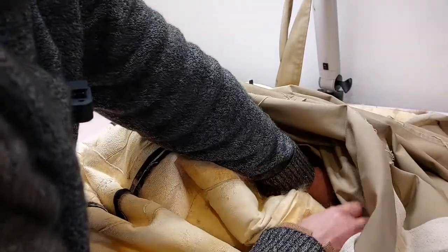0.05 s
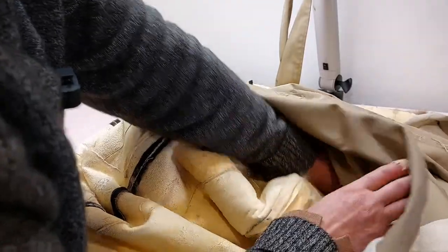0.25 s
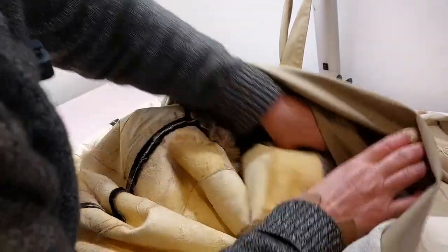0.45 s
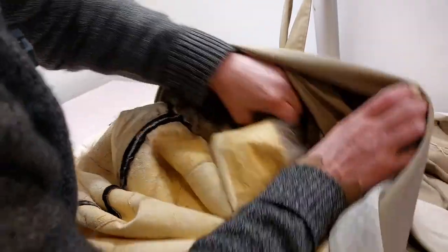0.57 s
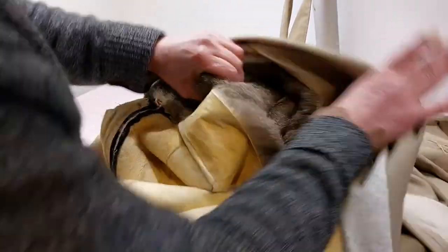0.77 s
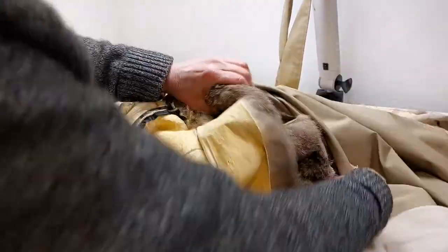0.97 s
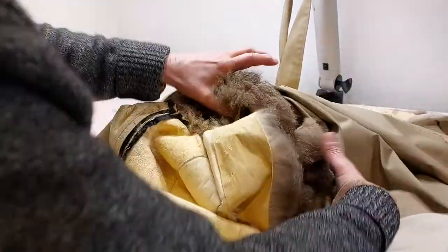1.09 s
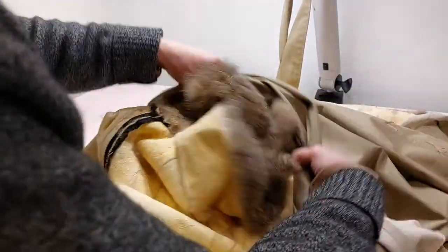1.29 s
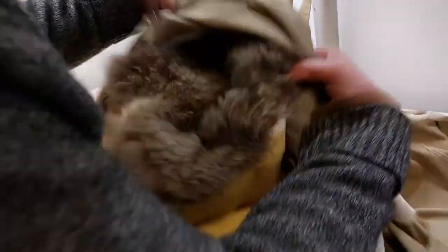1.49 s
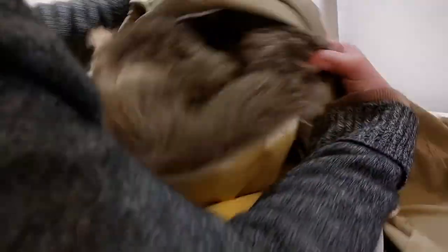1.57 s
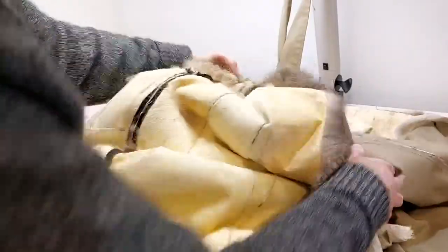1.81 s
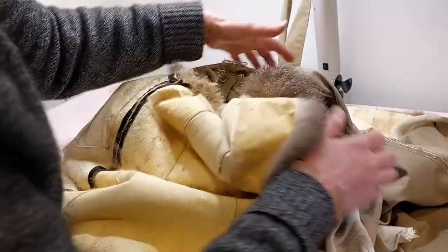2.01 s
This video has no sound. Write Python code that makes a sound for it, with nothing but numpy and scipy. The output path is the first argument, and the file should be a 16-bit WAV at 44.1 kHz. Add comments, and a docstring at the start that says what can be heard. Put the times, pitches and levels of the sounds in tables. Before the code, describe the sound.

Close rustling of a thick coat being folded by hand, with dull pops and soft thumps.

```python
"""A heavy fur-lined coat, folded and turned by hand on a table, close to a stereo pair in a small room.
Cloth slides on cloth with a grainy swish, the thick hide crumples, and single folds buckle with dull pops.
The coat's weight thumps down softly a few times; seams tick, a button knocks, a sleeve zips over the weave.
Behind it are a short tail from the walls and a low, steady room tone."""
import sys
import numpy as np
from scipy import signal
from scipy.fft import rfft, irfft, next_fast_len
from scipy.io import wavfile

SR = 44100
rng = np.random.default_rng(int(sys.argv[2]) if len(sys.argv) > 2 else 0)


def wav_record(signal):
    """Record a signal, one row per channel, as 16-bit PCM in the file named by sys.argv[1]."""
    frames = np.transpose(np.atleast_2d(signal))
    bounded = np.clip(frames, -1, 1)
    # unit amplitude maps onto the largest positive 16-bit level
    quanta = np.round(bounded * 32767).astype(np.int16)
    wavfile.write(sys.argv[1], SR, quanta)


N = 90404

# Colours of the room tone and of the coat's noises: frequency_hz, relative_db
ROOM_TONE_COLOUR = [(20,-16),(35,-14),(54,0.5),(85,1.5),(200,-1.5),(550,-5.5),(1100,-14),(2500,-18),(7000,-23.5),(15000,-24)]
HIDE_COLOUR = [(25,-46),(60,-24),(115,-5.5),(165,-1),(205,3),(330,0.2),(560,-0.5),(800,-6),(1100,-20.5),(2500,-40)]
SWISH_COLOUR = [(1200,-32),(2500,-3.5),(3500,.5),(5000,-0.5),(6800,-2),(9000,-7.5),(12000,-11.5),(15500,-15.5)]
RASP_COLOUR = [(400,3),(820,-3.5),(1200,-1.5),(1950,0.5),(2700,-2),(3600,-7),(6000,-19),(12000,-35)]
FUR_COLOUR = [(3000,-34),(6500,4),(9000,7),(12500,-14),(15500,-5)]
# Decay of the small room: frequency_hz, t60_s
ROOM_DECAY = [(100,0.75),(500,0.31),(3000,0.3),(12000,0.14)]
# Stereo width at the microphones: frequency_hz, side_gain_db
STEREO_WIDTH = [(120,-93),(500,-31.5),(1200,-43),(2000,-49),(4000,-17),(8000,-11.5),(12000,-5),(16000,-8.5)]
# Phase lead of the left microphone over the right: frequency_hz, lead_rad
LEFT_MIC_LEAD = [(0,0),(1800,0.0013),(4000,0.53),(7000,0.79),(11000,1.4),(16000,2.5)]
# Ring of the button: pitch_hz, level_db, t60_s
BUTTON_RING = [(830,-40,.035),(1040,-37,.035)]
# Ticks and scuffs of seams and creases: start_s, peak_db, pitch_hz, fade_s
SEAM_TICKS = [(.104,-35.5,2800,0.0036),(.442,-27.5,5600,0.0016),(.622,-28,4120,0.0049),(.662,-27.5,3400,0.003),(.677,-31,2280,0.002),(0.708,-29.5,2120,0.0029),(.731,-33,2700,0.00082),(.763,-33,6000,.008),(.851,-40,1800,0.008),(1.0935,-38.5,1560,0.0018),(1.102,-43,1870,0.0027),(1.164,-39.5,850,0.0031),(1.201,-34,1390,0.002),(1.2095,-36,1900,0.002),(1.385,-31,650,.008),(1.736,-36,1630,0.0024)]
# The coat's weight settling on the table: centre_s, relative_db, pitch_hz
WEIGHT_THUMPS = [(.68,-31.5,127),(.735,-40.5,75),(.845,-41,85),(1.244,-33,133),(1.497,-29.5,119),(1.691,-29,129),(1.72,-40,58),(1.83,-45,50)]
# Single folds buckling: centre_s, relative_db, pitch_hz
FOLD_POPS = [(0.1056,-34,424),(.274,-21,430),(0.3221,-36,260),(0.4579,-27.5,370),(.529,-35,342),(0.5357,-21.5,279),(.61,-29.5,348),(.6405,-31,520),(.6527,-17.5,520),(.659,-22.5,470),(0.6784,-24,243),(.7097,-22,347),(0.7322,-27.5,405),(0.7421,-25,486),(.8027,-28.5,338),(.855,-26.5,300),(0.9426,-28.5,350),(1.0045,-30,390),(1.0947,-25.5,635),(1.1673,-34,350),(1.1883,-29,278),(1.2035,-27,363),(1.212,-32,260),(1.2774,-36,355),(1.39,-28,504),(1.4347,-26.5,350),(1.4911,-23,487),(1.4977,-22.5,230),(1.5163,-24,326),(1.5251,-20.5,374),(1.5352,-25,297),(1.5965,-24,434),(1.6248,-31,270),(1.678,-20.5,355),(1.688,-19.5,232),(1.9481,-43.5,268),(2.0405,-39,470)]
# Bending of the hide: time_s, relative_db
HIDE_BENDS = [(0,-52),(.04,-53.5),(.08,-59.5),(.13,-50),(.2,-51),(.41,-46.5),(.445,-39),(.495,-45.5),(.59,-45),(.63,-37.5),(.68,-38.5),(.72,-47.5),(.78,-39.5),(.82,-47),(.87,-36.5),(.93,-49),(.98,-52),(1.07,-53),(1.14,-48.5),(1.19,-44),(1.26,-49),(1.375,-45.5),(1.388,-37),(1.42,-32),(1.47,-38.5),(1.51,-30),(1.56,-40),(1.63,-43),(1.68,-34),(1.76,-39.5),(1.79,-51.5),(1.87,-56.5),(2.05,-64.5)]
# Strokes of cloth on cloth: time_s, relative_db, rasp_offset_db
CLOTH_STROKES = [(0,-62,0),(.094,-59.8,-1),(.108,-51.5,-1),(.17,-50.8,-1),(.225,-45.2,-4.5),(.31,-50.3,1.5),(.41,-49.3,.5),(.45,-47.3,.5),(.6,-47.2,-1),(.645,-47.2,-.3),(.665,-44.6,1.8),(.72,-47.2,2),(.77,-45.6,-.5),(.87,-54.3,3),(.95,-57.5,2.5),(1.02,-54,0),(1.09,-60.5,2.5),(1.25,-55.5,1),(1.30,-48.8,-2.5),(1.40,-47.5,3),(1.49,-42.3,4.5),(1.525,-40.8,1.3),(1.548,-42.5,2.5),(1.592,-54,4.5),(1.65,-55,6),(1.70,-48.8,2.5),(1.755,-52,4.5),(1.80,-60,0),(1.85,-62.5,-1),(1.89,-58.5,-1),(1.94,-65,-1),(2.05,-68,-1)]


def amp(db):
    """Decibels to gain."""
    return 10 ** (np.asarray(db) / 20)


def unit(x):
    """Scale to rms 1."""
    return x / np.sqrt(np.mean(x ** 2) + 1e-20)


def along(points, hz):
    """Read (frequency_hz, value) points at hz, on a log axis."""
    knots_hz, values = np.transpose(points)
    return np.interp(np.log(hz + 1), np.log(knots_hz + 1), values)


def curves(rows):
    """One value per sample for each column after the time."""
    time_s, *columns = np.transpose(rows)
    return [np.interp(np.arange(N) / SR, time_s, column) for column in columns]


def wobble(rate):
    """A random curve, rate knots a second."""
    return np.interp(np.arange(N) * rate / SR, np.arange(N // 20), rng.standard_normal(N // 20))


def filtered(x, response):
    """Pass x through a frequency response."""
    n = x.shape[-1]
    padded = next_fast_len(n + SR // 10, True)
    return irfft(rfft(x, padded) * response(np.fft.rfftfreq(padded, 1 / SR)), padded)[..., :n]


def coloured(x, colour):
    """x with the given colour, at rms 1."""
    return unit(filtered(x, lambda hz: amp(along(colour, hz))))


def add(out, start_s, sound):
    """Mix a short sound into out."""
    i = max(0, round(start_s * SR))
    out[i:i + len(sound)] += sound[:len(out[i:])]


def slips(rate, spread_db):
    """Tiny slips at random moments, rate a second, their sizes scattered by spread_db, at rms 1."""
    chance, size, sign = rng.random(N), rng.standard_normal(N), rng.choice([-1, 1], N)
    return unit((chance < rate / SR) * sign * amp(spread_db * np.clip(size, -2, 2)))


def puffs(rows, half_width_cycles):
    """One push of air for each row, about a cycle long."""
    out, t = np.zeros(N), np.arange(-SR // 20, SR // 20) / SR
    for centre_s, db, hz in rows:
        envelope = amp(db) * np.exp(-.5 * (t * hz / half_width_cycles) ** 2)
        add(out, centre_s + t[0], envelope * np.cos(2 * np.pi * (t * hz + rng.random())))
    return out


def room_tone(level_db=-59):
    """The low, steady noise of the room behind the coat."""
    return amp(level_db) * coloured(rng.standard_normal(N), ROOM_TONE_COLOUR)


def wall_reflections(x, gain_db=-16.5):
    """A short tail from the near walls, each frequency dying at its own speed."""
    hz, t, noise = signal.stft(rng.standard_normal(SR // 2), SR, nperseg=256)
    decay = amp(-60 * t / along(ROOM_DECAY, hz)[:, None])
    _, tail = signal.istft(noise * decay, SR, nperseg=256)
    tail = np.pad(tail, (SR // 250, 0)) / np.linalg.norm(tail)  # 4 ms behind the direct sound
    return amp(gain_db) * signal.fftconvolve(x, tail)[:N]


def sleeve_zip(start_s=1.882, length_s=0.0273, from_hz=1800, to_hz=2410, jitter=0.024, peak_db=-52):
    """A sleeve plucks the threads of the weave ever faster: a faint, rough, rising tone."""
    progress = np.clip((np.arange(N) / SR - start_s) / length_s, 0, 1)
    hz = (from_hz + (to_hz - from_hz) * progress) * (1 + jitter * wobble(1000))
    return amp(peak_db) * np.sin(np.pi * progress) * np.sin(2 * np.pi * np.cumsum(hz) / SR)


def button_knock(start_s=1.099, attack_s=0.00065):
    """A hard little button knocks on the table and rings briefly under the cloth."""
    out, t = np.zeros(N), np.arange(SR // 10) / SR
    ring = sum(amp(db - 60 * t / t60) * np.sin(2 * np.pi * hz * t) for hz, db, t60 in BUTTON_RING)
    add(out, start_s, ring * (1 - np.exp(-t / attack_s)))
    return out


def seam_ticks(half_width_octaves=0.82):
    """A seam or crease flicks past an edge: a very short burst of noise."""
    out, t = np.zeros(N), np.arange(SR // 20) / SR
    for start_s, peak_db, pitch_hz, fade_s in SEAM_TICKS:
        band = lambda hz: np.exp(-.5 * (np.log2((hz + 1) / pitch_hz) / half_width_octaves) ** 2)
        hiss = filtered(rng.standard_normal(len(t)), band)
        burst = hiss * np.exp(-t / fade_s) * (1 - np.exp(-t * pitch_hz))
        add(out, start_s, amp(peak_db) * burst / np.abs(burst).max())
    return out


def weight_thumps(gain_db=-2.5):
    """The padded weight lands on the table with a soft low push."""
    return amp(gain_db) * puffs(WEIGHT_THUMPS, half_width_cycles=0.5)


def fold_pops(gain_db=0.57, low_cut_hz=185):
    """Each large fold snaps through once and does not ring; it is too small to push much bass."""
    snaps = puffs(FOLD_POPS, half_width_cycles=0.38)
    return amp(gain_db) * filtered(snaps, lambda hz: hz ** 4 / np.sqrt(hz ** 8 + low_cut_hz ** 8))


def hide_crumpling(gain_db=-0.5):
    """Many small folds give way in the thick hide, harder while it is being bent."""
    bend_db, = curves(HIDE_BENDS)
    return coloured(slips(rate=1500, spread_db=2.5), HIDE_COLOUR) * amp(bend_db + gain_db)


def cloth_sliding(swish_db=0.5, rasp_db=1.5, fur_db=-12.5, fast_stroke_db=-44, fur_db_per_db=0.55):
    """Fibres catch and slip: a bright swish over a coarser rasp; fast strokes add the fur's airy hiss."""
    stroke_db, rasp_offset_db = curves(CLOTH_STROKES)
    swish = coloured(slips(rate=9000, spread_db=0), SWISH_COLOUR)
    swish *= amp(swish_db + 0.62 * wobble(140))
    rasp = coloured(slips(rate=4000, spread_db=2), RASP_COLOUR)
    rasp *= amp(rasp_db + rasp_offset_db + 0.43 * wobble(110))
    fur = coloured(slips(rate=8900, spread_db=6), FUR_COLOUR)
    fur *= amp(fur_db + fur_db_per_db * (stroke_db - fast_stroke_db) + wobble(39.6))
    return amp(stroke_db + 0.63 * wobble(70.65)) * (swish + rasp + fur)


def scene():
    """Close up, both microphones get the same bass; the hiss differs and reaches the left one first."""
    coat = cloth_sliding() + hide_crumpling() + fold_pops() + weight_thumps()
    coat += seam_ticks() + button_knock() + sleeve_zip()
    mid = coat + wall_reflections(coat) + room_tone()
    side = filtered(cloth_sliding() + room_tone(), lambda hz: amp(along(STEREO_WIDTH, hz)))
    left_right = np.array([mid + side, mid - side])
    return filtered(left_right, lambda hz: np.exp(.5j * np.outer([1, -1], along(LEFT_MIC_LEAD, hz))))


def record(dry, low_cut_hz=44, top_hz=15790):
    """The recorder thins the deepest bass and keeps nothing above its band limit."""
    return filtered(dry, lambda hz: (hz < top_hz) * hz ** 2 / np.sqrt(hz ** 4 + low_cut_hz ** 4))


dry = scene()
out = record(dry)
wav_record(out)
```